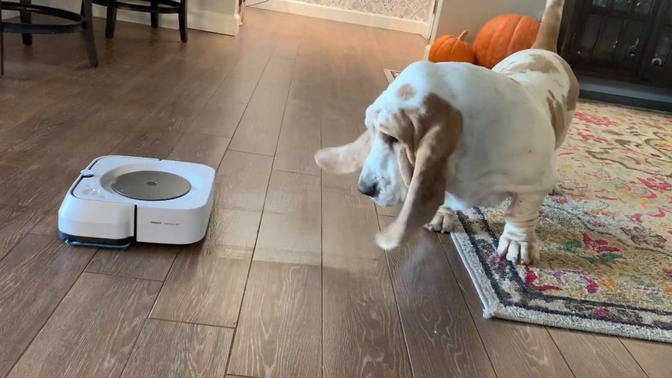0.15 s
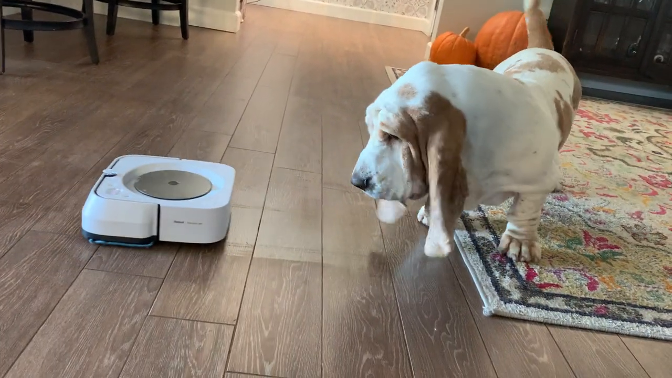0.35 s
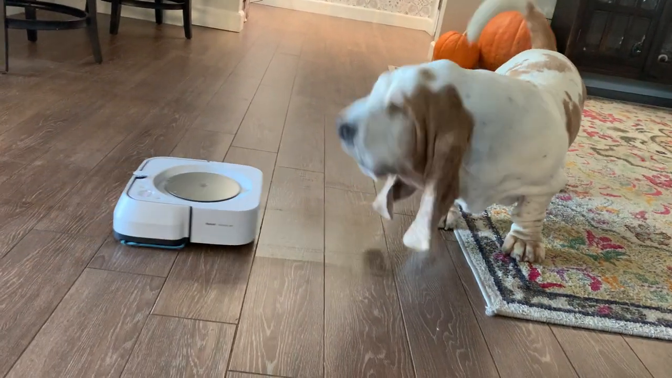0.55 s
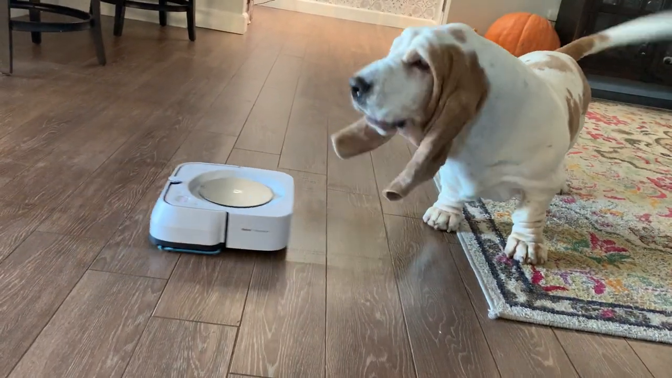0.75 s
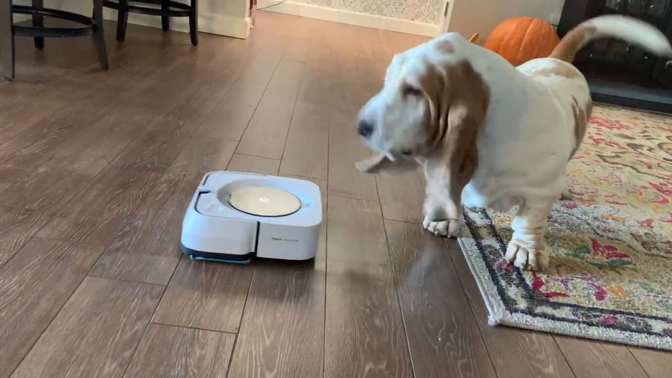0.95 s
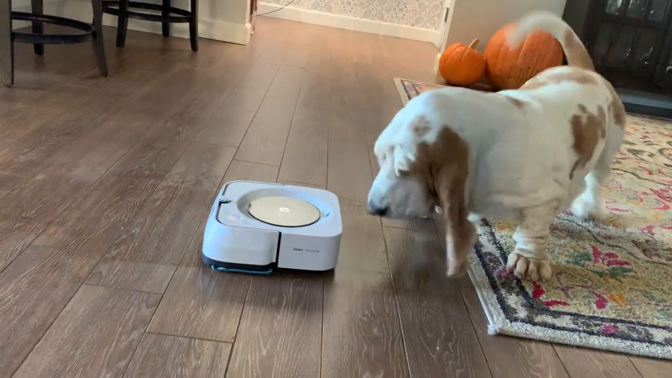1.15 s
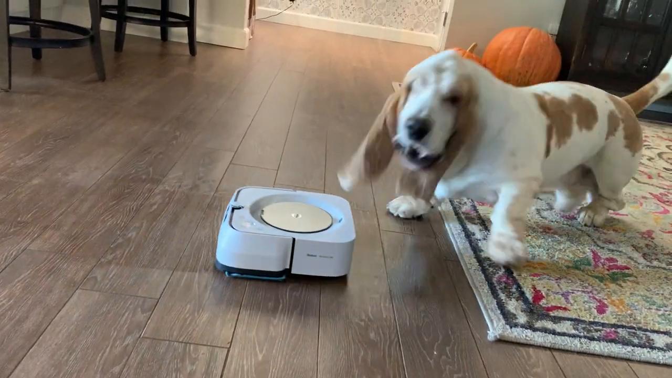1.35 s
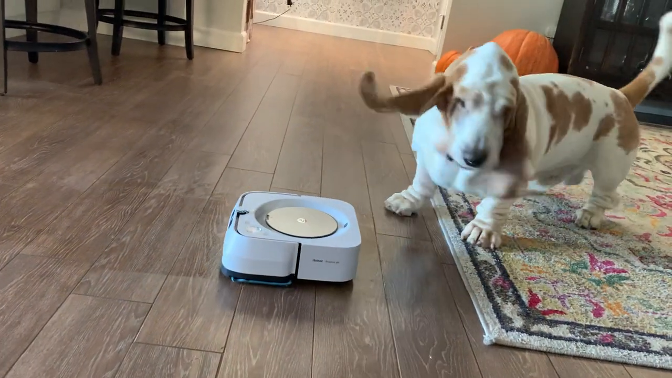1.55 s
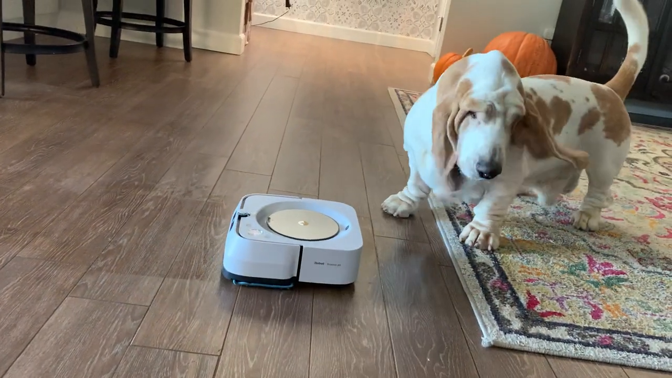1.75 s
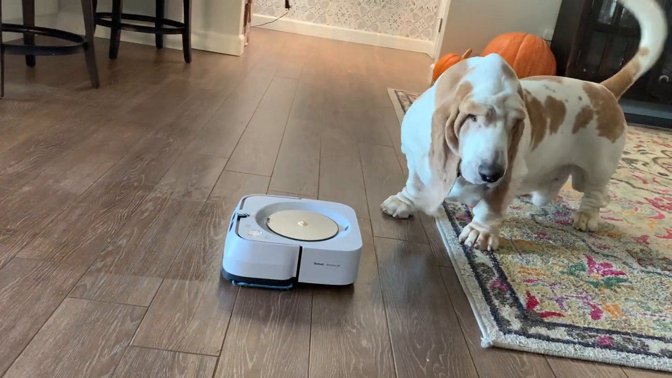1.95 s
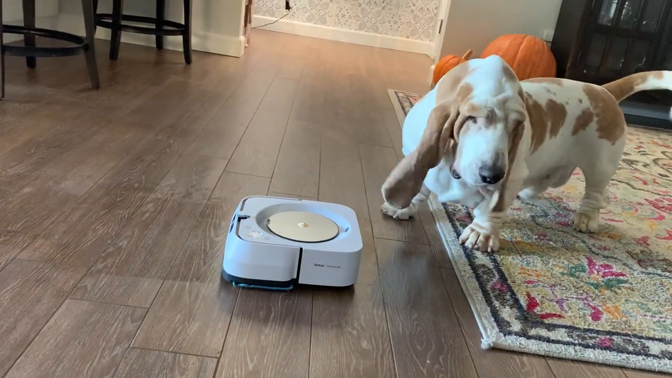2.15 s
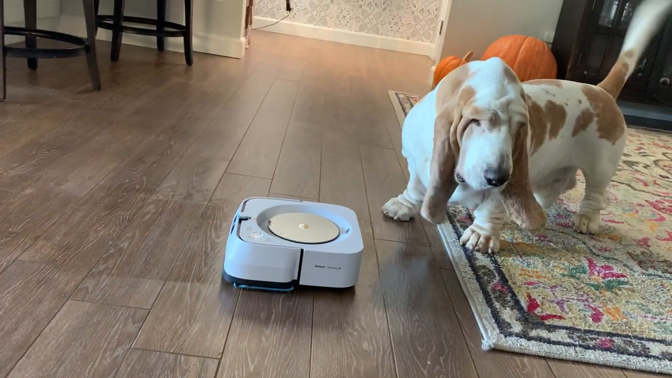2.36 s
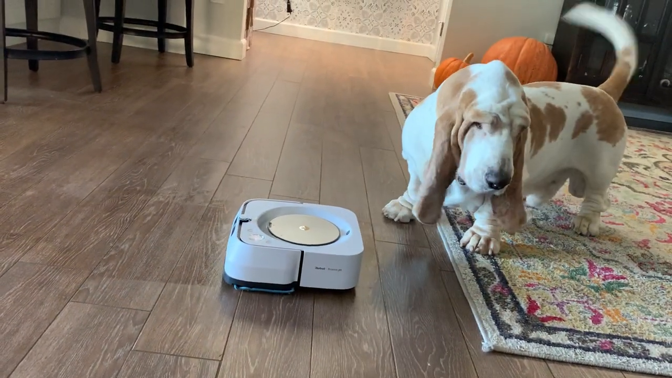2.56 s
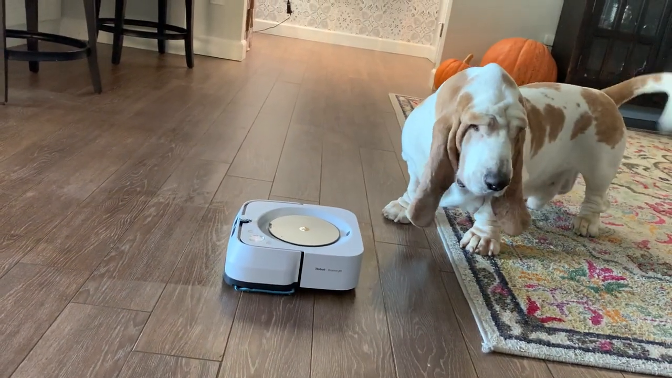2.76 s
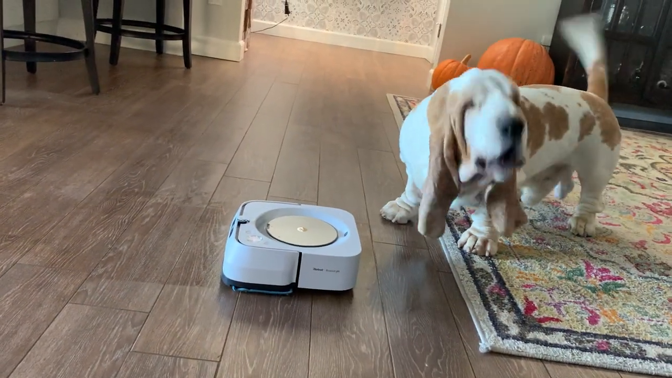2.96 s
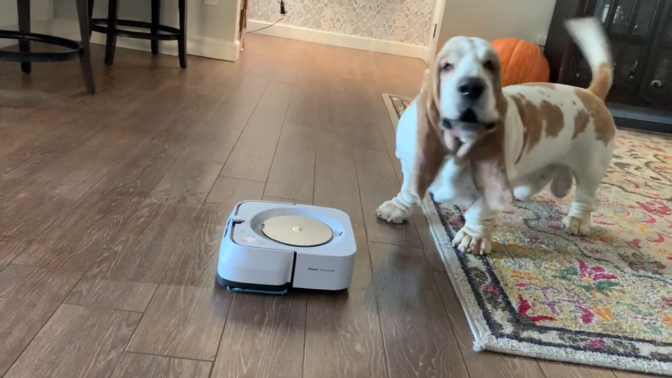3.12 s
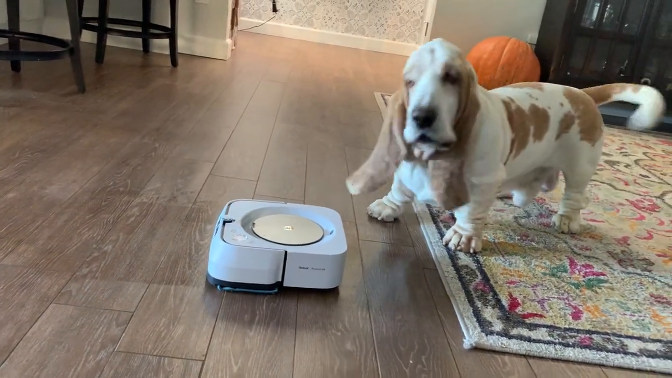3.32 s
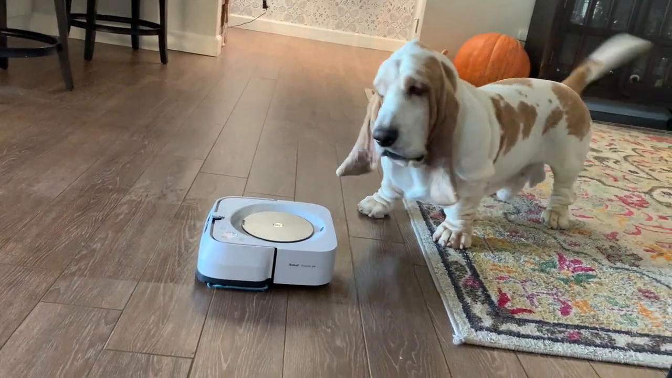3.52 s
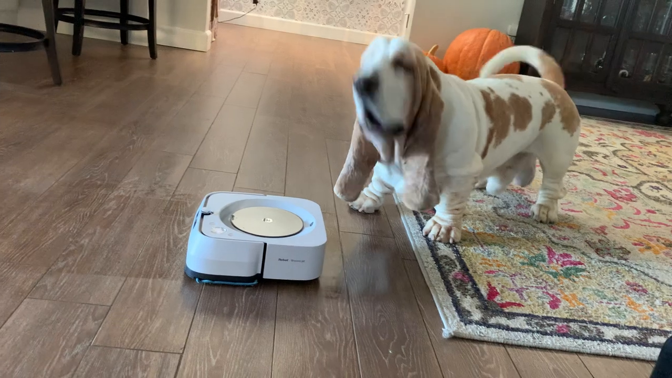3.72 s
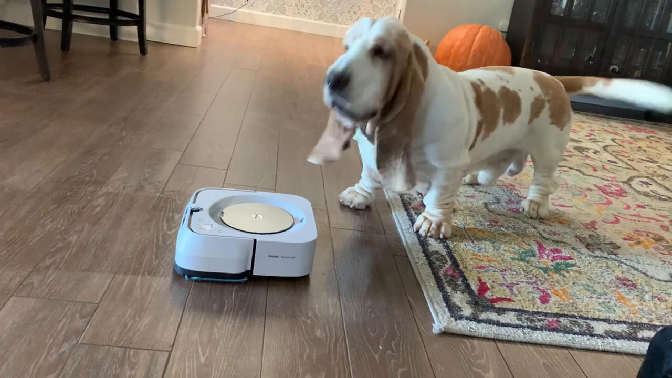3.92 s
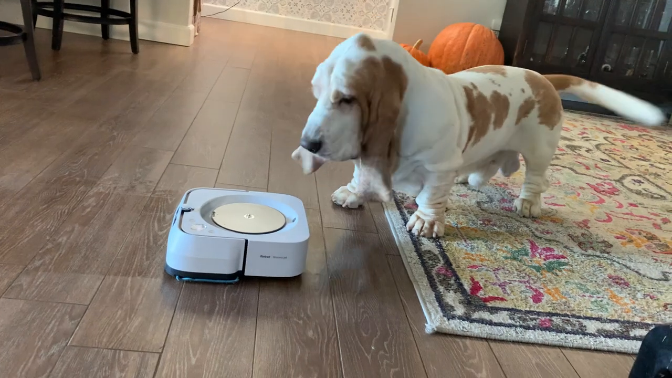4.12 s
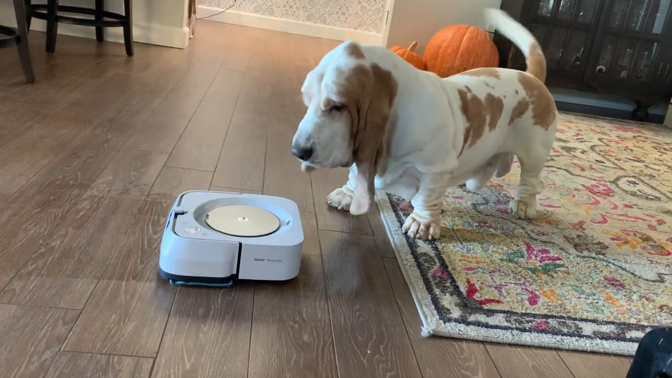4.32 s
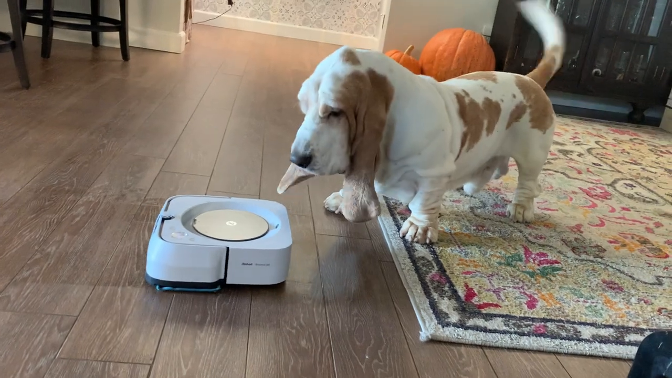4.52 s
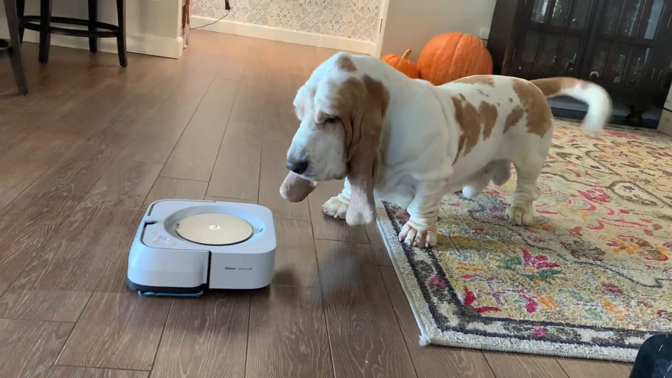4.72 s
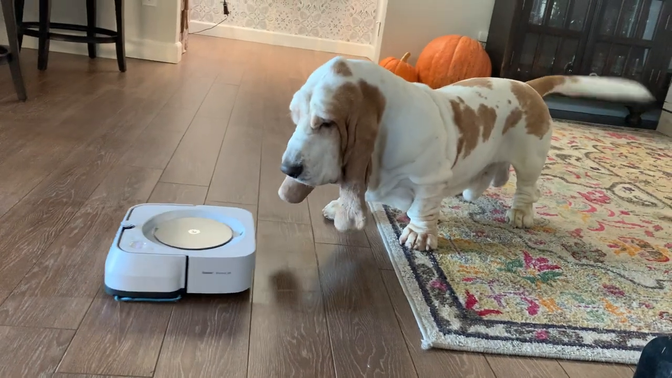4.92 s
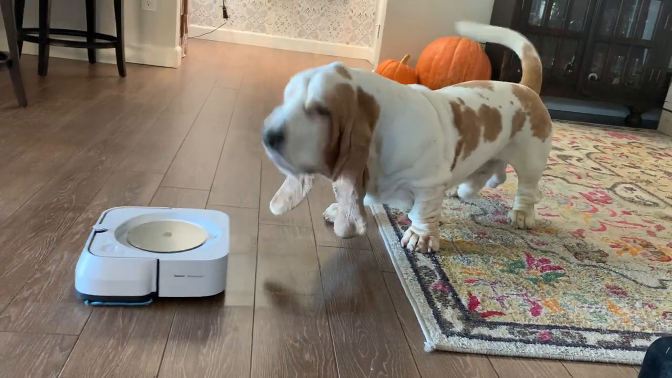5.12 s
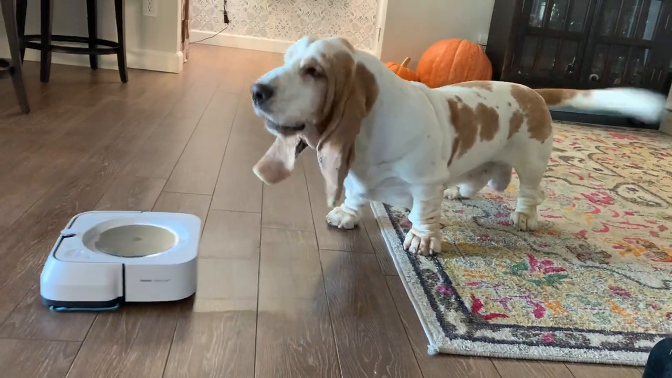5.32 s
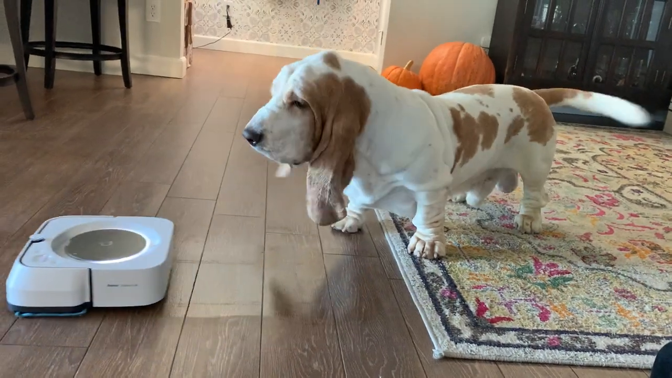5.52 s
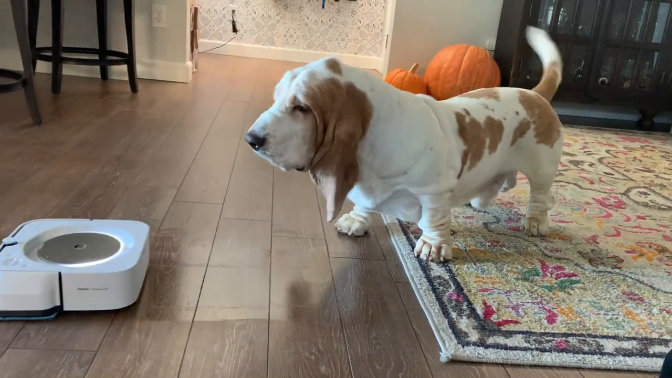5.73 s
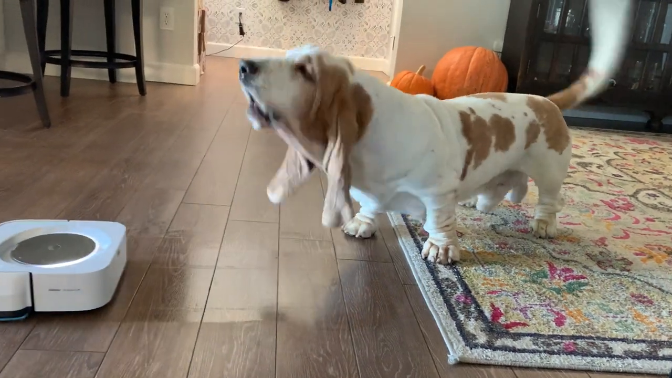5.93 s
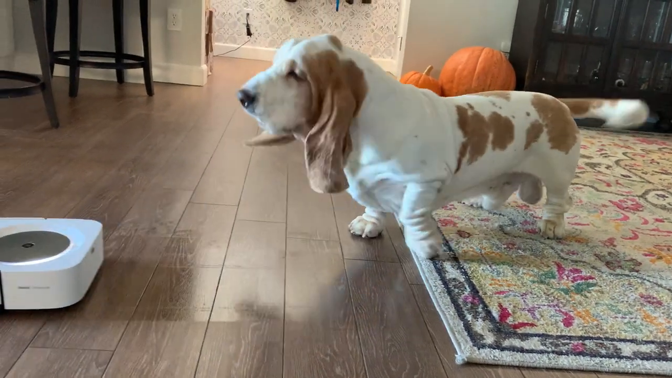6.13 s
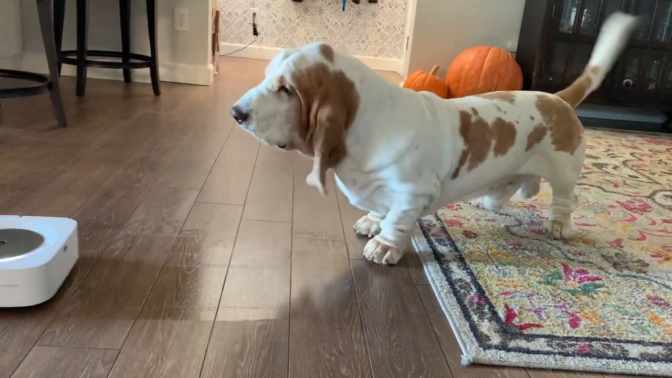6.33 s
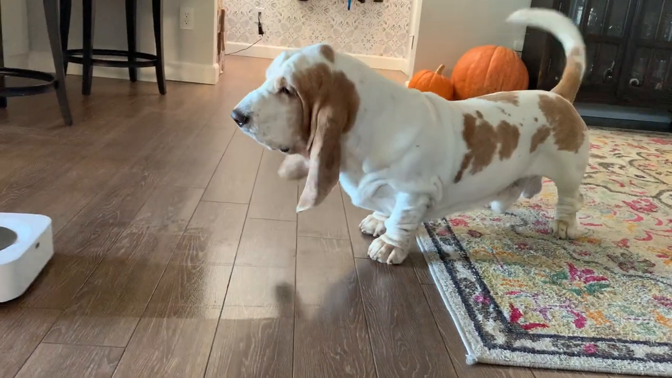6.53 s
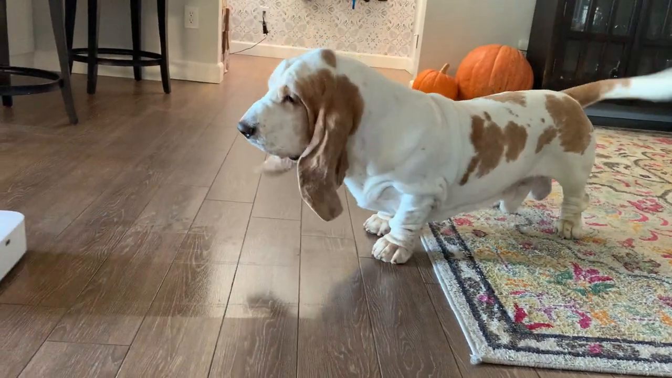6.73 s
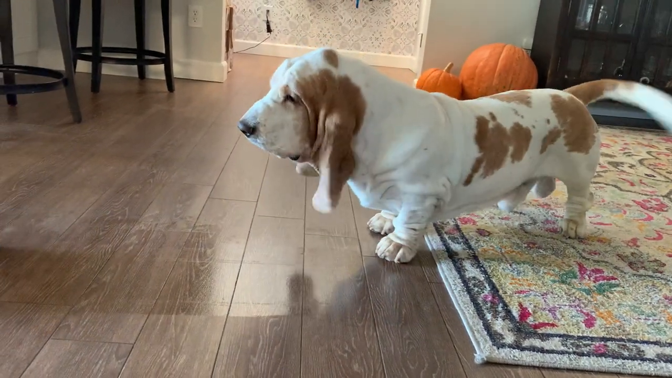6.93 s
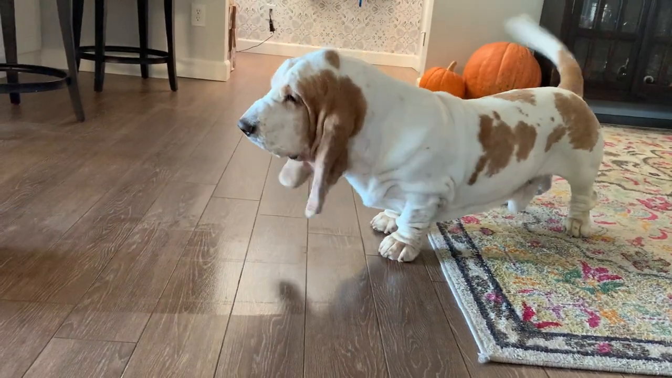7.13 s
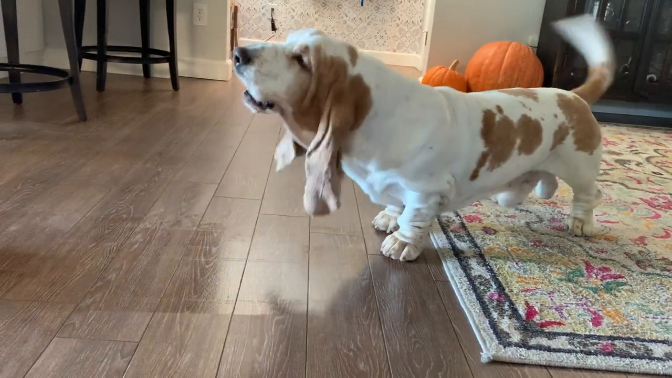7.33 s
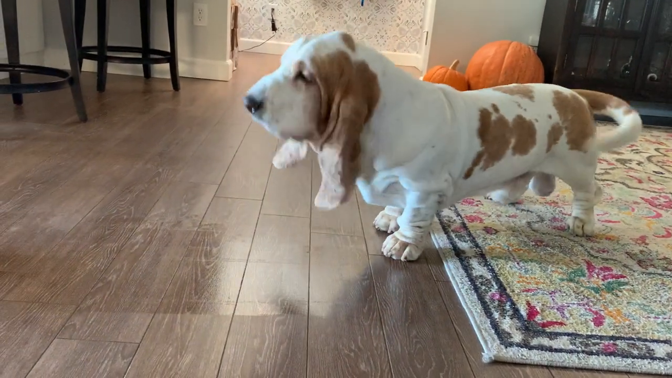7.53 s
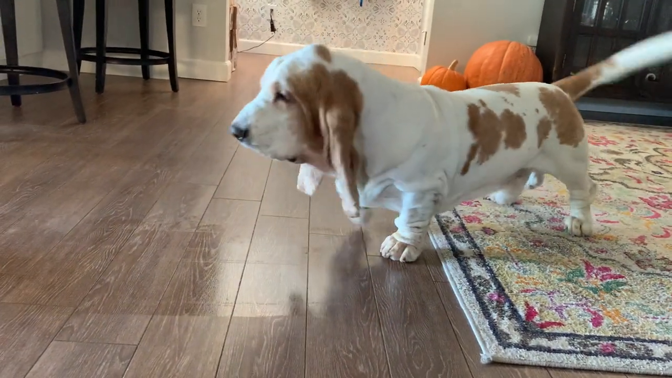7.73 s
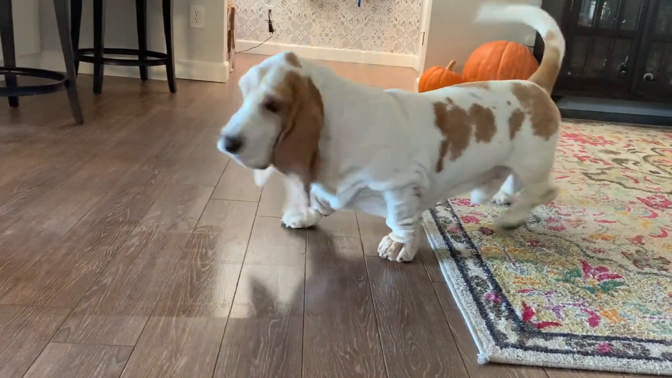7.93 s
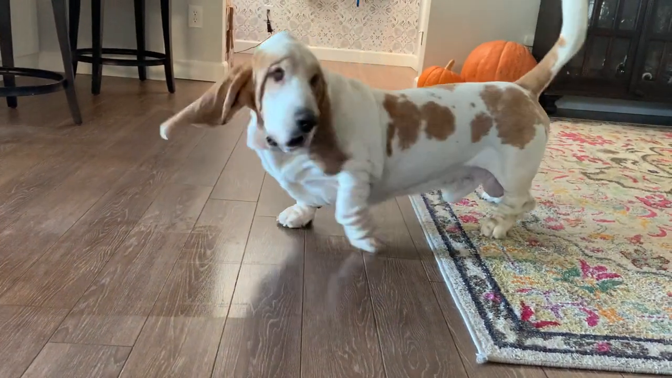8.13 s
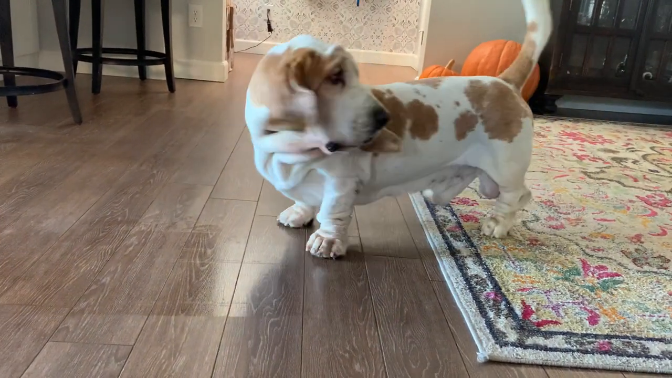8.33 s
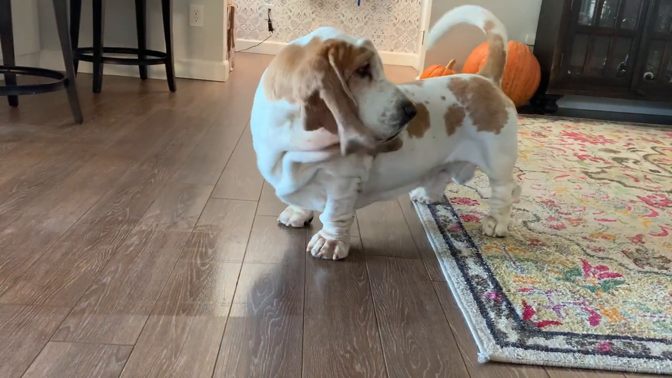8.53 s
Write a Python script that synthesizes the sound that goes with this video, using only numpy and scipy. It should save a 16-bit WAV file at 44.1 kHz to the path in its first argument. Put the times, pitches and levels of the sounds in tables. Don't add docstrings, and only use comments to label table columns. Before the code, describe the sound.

Loud, rounded woofs, each swooping up and quickly down, bounce off a wooden floor and cupboards. Between them lie a faint motor whir, a brief soft jet with a pump whine, tiny claw ticks and dull far thumps. The drive grows clearer in the second half, and after the seventh bark heavy footfalls knock on the boards. Close handheld phone pickup, stereo, with low rumble.

```python
import sys
import numpy as np
from scipy import signal
from scipy.fft import rfft, irfft, next_fast_len
from scipy.io import wavfile
from scipy.ndimage import uniform_filter1d

SR = 44100
rng = np.random.default_rng(int(sys.argv[2]) if len(sys.argv) > 2 else 0)


def master_out(mix):
    frames = np.transpose(np.atleast_2d(mix))
    ceiling = np.clip(frames, -1, 1)
    pcm = np.round(ceiling * 32767).astype(np.int16)
    wavfile.write(sys.argv[1], SR, pcm)


def natural_amplitude(level_db):
    exponent = np.asarray(level_db, float) / 20
    return 10 ** exponent


N = 382347

# top of the arch in seconds, top pitch in Hz, effort in dB, rise in seconds, fall in seconds.
BARKS = [(.635, 463, -.5, .12, .175), (1.338, 445.7, 1.5, .135, .135), (3.01, 459, 1.5, .13, .155),
         (3.783, 454.8, 2, .112, .16), (5.225, 461.3, 2, .142, .17), (5.96, 453.4, 2.5, .11, .16),
         (7.35, 452.4, 3.5, .138, .17)]
# growled lead-in in seconds, gaping mouth in Hz, held mouth in Hz,
# brightness in dB, hoarseness 0-1.
MOUTHINGS = [(.085, 2000, 1300, -1, 0.07), (.04, 1880, 1620, -3, 0.18), (.045, 1993, 1290, 2, 0.03),
             (.038, 1780, 1290, 2, 0.06), (.11, 2000, 1300, 0, .05), (.027, 1666, 1280, -4, .05),
             (.07, 1748, 1272.4, -5, .06)]
# place (-2 lead-in starts, -1 rise starts, 0 top, 1 fall ends),
# share of top pitch, effort in dB, gape 0-1, mouth ring in dB, chest ring in dB.
ARCH = [(-2, .16, -68, 0.964, -7.5, 11.5), (-1, .34, -45.5, 0.955, -6, 8), (-.75, .69, -27, .85, 3.5, -4),
        (-.5, .9, -18.5, .42, 3.5, -2), (-.25, 0.9615, -14.5, .03, 4.5, -2.5), (0, 0.9984, -15, .01, 0, -7),
        (.36, .91, -21, .01, 2, -0.66), (.55, .75, -36.5, 0.075, 0.3, 3.5),
        (0.961, 0.25, -52, -.2, 0.5, 5.5)]
# centre in Hz, width in Hz, level in dB.
CHEST = [(440, 160, 1), (816.8, 130, -1.5)]
# centre in Hz, width in Hz, level in dB.
UPPER_THROAT = [(3514, 620, -25), (4755, 1000, -22.5), (5660, 830, -25), (8357, 1000, -33),
                (9223, 1700, -35.5)]
# centre in Hz, width in Hz, depth in dB.
POCKETS = [(2760, 270, -26), (7050, 350, -18)]
# frequency in Hz, share 0-1.
RASP = [(400, .02), (1500, .05), (3000, .14), (6000, .35), (9000, .75)]
# frequency in Hz, level in dB.
BREATH_TONE = [(1000, -22.5), (1800, -12), (2800, -31), (4300, -16), (7000, -25), (9300, 4), (10800, -10.5),
               (13500, -3.5), (16000, -13)]
# delay in seconds, level in dB.
BOUNCES = [(.0032, -11.5), (.0075, -15), (0.0127, -13), (.017, -19.5), (.023, -19)]
# frequency in Hz, T60 in seconds.
KITCHEN_T60 = [(60, 0.88), (130, 0.17), (250, 0.58), (500, 0.5312), (1300, 0.605), (3000, 0.62),
               (6000, 0.37), (12000, 0.48)]
# frequency in Hz, level in dB.
VOICE_TAIL = [(100, -9.5), (500, -2), (1500, -12), (3000, -12.5), (9000, -10)]
# frequency in Hz, level in dB.
KNOCK_TAIL = [(100, -0.92), (600, -1.5), (9000, 0.04)]
# frequency in Hz, likeness 0-1.
TAIL_LIKENESS = [(100, 0.9955), (300, 0.39), (600, 0.6), (1200, 0.25), (3000, 0.47), (9000, 0.46)]
# frequency in Hz, left minus right in dB.
PORT_LEVEL = [(60, -1), (300, 2), (600, -0.5), (1200, -2.5), (2400, -0.2), (4500, -4.5), (8000, -0.77),
              (13000, 1.95)]
# frequency in Hz, left lead in radians.
PORT_PHASE = [(60, .2), (300, 0.48), (600, 0.27), (1200, 0.41), (2400, 1.1), (4500, 2.1), (8000, 0.64),
              (13000, 1.4)]
# start in seconds, peak in dB, rattle in dB, push in Hz, room share in dB.
KNOCKS = [
    (2.188, -39, -103, 64.8, 12),
    (4.327, -39, -76, 156, -3),
    (4.56, -40, -84, 139.3, 11),
    (4.85, -74.5, -79, 81.7, -0.5),
    (6.636, -47, -72, 86.7, 14),
    (6.851, -37.5, -72, 104, 18.5),
    (7.726, -23, -48, 158.6, 10.5),
    (8.29, -18, -47, 92.1, 11.5),
]
# frequency in Hz, level in dB.
RATTLE_TONE = [(100, 24), (250, 25), (600, 18), (1200, 13), (2200, 7.5), (4000, -1), (8000, -7.5),
               (14000, -12)]
# start in seconds, level in dB, pitch in
# Hz, length in seconds.
DRY_PUFFS = [(2.962, -37, 80, .03), (5.778, -38, 110, .034), (5.781, -40, 800, .007),
             (5.784, -44, 330, .011)]
# start in seconds, peak in dB.
CLAW_TICKS = [(1.0293, -51.5), (1.0417, -56.5), (4.3251, -69), (8.1688, -58.5), (8.1871, -54)]
# time in seconds, level in dB.
DRIVE_LEVEL = [(0, -84), (.3, -79.5), (1.1, -74.5), (2.3, -99), (4.3, -99), (4.6, -80), (5.0, -71),
               (5.4, -62.5), (6.0, -60), (7.1, -61.5), (7.7, -59.5), (8.67, -63.5)]
# frequency in Hz, level in dB per Hz.
DRIVE_TONE = [(240, -34), (400, -9.5), (705, -18.5), (821, -11), (1080, -23), (1660, -3.5), (2030, -10.5),
              (4090, -12), (7210, -26.5), (9210, -19), (11400, -43.5), (13300, -26.5), (15500, -44)]
# time in seconds, share of cruising speed.
DRIVE_SPEED = [(0, .74), (.45, 1.15), (1.1, 1.1), (1.8, .9), (4.3, .6), (4.65, .69), (5.0, .76),
               (5.35, 1.0), (8.67, 1.0)]
# centre in Hz, width in Hz, level in dB.
GEARS = [(814, 47, -22.5), (1648, 23, -8), (2472, 50, -13.5), (2690, 50, -19.5), (3081, 45, -15.5),
         (4126, 260, -16), (4110, 60, -17.5), (9220, 90, -23)]
# time in seconds, level in dB.
SPRAY_LEVEL = [(2.388, -90.5), (2.448, -69), (2.6, -61), (2.799, -65), (3.199, -68), (3.5, -66), (3.6, -85)]
# frequency in Hz, level in dB per Hz.
SPRAY_TONE = [(180, -73), (300, -35), (484, 0.5), (1050, -8.5), (1810, -10), (2360, -31), (3400, -10.5),
              (5760, -15.5), (9760, -18), (11500, -31.5), (15500, -22)]
# time in seconds, share of full speed.
PUMP_SPEED = [(2.4, .45), (2.47, .8), (2.55, .96), (2.65, 1.02), (2.75, .95), (2.85, .8), (3.6, .95)]
# frequency in Hz, level against the jet in dB.
PUMP_WHINE = [(1800, -18), (4500, -20), (3500, -22), (487, -17.5)]
# frequency in Hz, level against the jet in dB.
NOZZLE = [(9598, -14), (10045, -10)]
# time in seconds, level in dB, half length in seconds.
SHIFTS = [(1.62, -68.5, .1), (2.12, -64, .17), (2.65, -68, .12), (4.37, -57, .1), (4.9, -57, .13),
          (5.53, -56, .12), (6.95, -61.5, .2), (7.9, -56, .13), (8.47, -53, .08)]
# frequency in Hz, level in dB per Hz.
RUMBLE_TONE = [(12, -24.5), (20, 9), (140, -11), (294, -19), (468, -27.5), (1220, -38.5), (1480, -40.5),
               (1650, -31), (1890, -42), (3760, -44), (14000, -76)]
# frequency in Hz, likeness -1 to 1.
NOISE_LIKENESS = [(60, 0.94), (180, 0.097), (550, -0.6), (1650, -0.41), (4970, 0.019), (15000, 0.58)]
# centre in Hz, width in Hz, depth in dB.
MIC_NOTCH = (11600, 440, -34)

DOG_PAN_DB, UPPER_DB, BREATH_DB = -1, -5.5, -47.5
MOUTH_WIDTH_HZ, SOFT_HZ = 278.7, 189.6
DULL_HZ = 90
NOSE_HZ, NOSE_DB, NOSE_PER_BRIGHT = 2260, -15.5, 1.1
NOSE_FOLLOWS, HELD_HZ = 0.15, 1260
UPPER_PER_BRIGHT, UPPER_PER_HOARSE_DB = 1, 39.5
RATTLE_T60_S = 0.048
RUMBLE_DB, RUMBLE_GROWS_DB_PER_S = -72.5, 1.1159
SHAKE_DB, SHAKE_S, SHAKE_LAG_S = -57.5, 0.15, 0.08
HUM_HZ, HUM_DB = 119, -77
MIC_LOW_HZ = 60.24
CONTROL_STEP = 32
TAIL_SIZE = 30000


def dog():
    out = np.zeros((2, N))
    tails = kitchen(VOICE_TAIL, count=len(BARKS))
    for call, mouthing, tail in zip(BARKS, MOUTHINGS, tails):
        start, voice = bark(call, mouthing)
        near = np.pad(voice, ((0, 0), (0, 1500)))
        head_moves = rng.uniform(-1, 1, (len(BOUNCES), 2))
        for (delay, db), (stretch, sign) in zip(BOUNCES, head_moves):
            add(near, delay * (1 + 0.15 * stretch), natural_amplitude(db) * np.sign(sign) * voice)
        add(out, start, near)
        add(out, start, signal.fftconvolve(near, tail, axes=1))

    def half(f):
        return natural_amplitude(read(PORT_LEVEL, f) / 2) * np.exp(0.5j * read(PORT_PHASE, f))
    return coloured(out, lambda f: np.array([half(f), 1 / half(f)]))


def bark(call, mouthing):
    *mouth, bright_db, hoarse = mouthing
    t, hz, effort_db, *tract = gesture(*call, *mouth)
    wobble_hz = 2.0 * evened(uniform_filter1d(rng.standard_normal(len(t)), size=300))
    turns = np.cumsum(hz + wobble_hz) / SR
    controls = [v[::CONTROL_STEP] for v in [hz, *tract]]
    throat = throat_of(*controls, bright_db, hoarse, (mouth[2] / HELD_HZ) ** NOSE_FOLLOWS)
    fundamental = np.exp(2j * np.pi * turns)
    overtones = np.cumprod(np.tile(fundamental, (len(throat), 1)), axis=0)
    voice = -(filled(throat, len(t)) * overtones).real.sum(0)
    puffs = (0.2 + np.exp(-(turns % 1) / 0.25)) * rng.standard_normal(len(t))
    gusts = natural_amplitude(2.1 * evened(uniform_filter1d(rng.standard_normal(len(t)), size=900)))
    breath = evened(coloured(puffs, lambda f: natural_amplitude(read(BREATH_TONE, f)))) * gusts
    breath_db = BREATH_DB - 8.0 * hoarse + 0.73 * (effort_db + 13.0)
    sound = natural_amplitude(effort_db) * voice + natural_amplitude(breath_db) * breath
    pan = natural_amplitude([[DOG_PAN_DB / 2], [-DOG_PAN_DB / 2]])
    return t[0], sound * signal.windows.tukey(len(t), 0.3) * pan


def gesture(top_s, top_hz, effort_db, rise_s, fall_s, lead_s, gape_hz, held_hz):
    place, pitch, db, gape, mouth_db, chest_db = np.transpose(ARCH)
    before = rise_s * np.maximum(place, -1) + lead_s * np.minimum(place + 1, 0)
    s = top_s + np.where(place < 0, before, fall_s * place)
    t = np.arange(s[0], s[-1], 1 / SR)
    mouth_hz = held_hz + gape * (gape_hz - held_hz)
    controls = np.log(top_hz * pitch), effort_db + db, mouth_hz, chest_db, mouth_db
    glide, *rest = (uniform_filter1d(np.interp(t, s, c), size=700, mode="nearest") for c in controls)
    return t, np.exp(glide), *rest


def throat_of(hz, mouth_hz, chest_db, mouth_db, bright_db, hoarse, stretch):
    f = np.arange(1, 36)[:, None] * hz
    throat = pole(f, *CHEST[0]) * natural_amplitude(chest_db) - pole(f, *CHEST[1])
    throat[0] *= 1 + (SOFT_HZ / hz) ** 2
    throat += 1j * natural_amplitude(mouth_db + bright_db) * pole(f, mouth_hz, MOUTH_WIDTH_HZ, 0) ** 2
    throat *= 1 - 0.7 * np.exp(-((f - 1.36 * mouth_hz) / 170) ** 2)
    nose_db = NOSE_DB + NOSE_PER_BRIGHT * bright_db
    throat += 1j * natural_amplitude(nose_db) * pole(f, NOSE_HZ * stretch, 340, 0) ** 2
    shift = stretch * (mouth_hz / 1300) ** 0.05
    upper_db = UPPER_DB + 0.72 * mouth_db + UPPER_PER_BRIGHT * bright_db + UPPER_PER_HOARSE_DB * hoarse
    upper = sum(natural_amplitude(db) * pole(f, centre * shift, width, 0) ** 2 for centre, width, db in UPPER_THROAT)
    throat += 1j * natural_amplitude(upper_db) * upper
    flutter = rng.standard_normal((*f.shape, 2))
    flutter = evened(uniform_filter1d(flutter, size=5, axis=1) @ [1, 1j])
    patches = evened(uniform_filter1d(rng.standard_normal(f.shape), size=40, axis=1))
    throat *= natural_amplitude(5.5 * patches * (f > 2500))
    throat *= dips(POCKETS, f / stretch) ** ((hz / hz.max()) ** 4)
    throat[1:] /= 1 + (DULL_HZ / hz) ** 2
    rasp = np.clip(read(RASP, f) + hoarse * (f > 700), 0, 1)
    return throat * (1 - rasp + rasp * flutter)


def kitchen(tail_db, count):
    taps = np.zeros((count, 2, TAIL_SIZE))
    at = np.arange(400, TAIL_SIZE, 20)
    shape = (count, 2, len(at))
    np.put_along_axis(taps, at + rng.integers(0, 20, shape), rng.choice([-1., 1.], shape), 2)
    hz, t, z = signal.stft(taps, SR, nperseg=256)
    same = np.clip(read(TAIL_LIKENESS, hz), 0, 1)[:, None]
    z[:, 1] = same * z[:, 0] + np.sqrt(1 - same ** 2) * z[:, 1]
    decay = natural_amplitude(-60 * t / read(KITCHEN_T60, hz)[:, None])
    tails = signal.istft(z * decay, SR, nperseg=256)[1]
    return coloured(tails / np.linalg.norm(tails[0, 0]), lambda f: natural_amplitude(read(tail_db, f)))


def boards():
    out = np.zeros((2, N))
    tails = kitchen(KNOCK_TAIL, count=len(KNOCKS))
    for (s, db, rattle_db, hz, room_db), tail in zip(KNOCKS, tails):
        sound = knock(db, rattle_db, hz)
        add(out, s, sound)
        add(out, s, natural_amplitude(room_db) * signal.fftconvolve(sound[None], tail, axes=1))
    for s, *puff in DRY_PUFFS:
        add(out, s, flap(*puff))
    for s, db in CLAW_TICKS:
        add(out, s, tick(db))
    return out


def knock(db, rattle_db, hz):
    t = np.arange(6000) / SR
    grit = rng.standard_normal(len(t))
    rattle = evened(coloured(grit, lambda f: natural_amplitude(read(RATTLE_TONE, f)) * (f > 150)))
    rattle *= natural_amplitude(rattle_db + 21.5 - 60 * t / RATTLE_T60_S) * (1 - np.exp(-t / 0.012))
    return ring(db, hz, t60_s=0.027, rise_s=0.0017) + rattle


def ring(db, hz, t60_s, rise_s):
    t = np.arange(6000) / SR
    return natural_amplitude(db - 60 * t / t60_s) * np.sin(2 * np.pi * hz * t) * (1 - np.exp(-t / rise_s))


def flap(db, hz, length_s):
    t = np.arange(0, length_s, 1 / SR)
    return natural_amplitude(db) * np.sin(2 * np.pi * hz * t) * np.hanning(len(t))


def tick(db):
    t = np.arange(1500) / SR
    grit = coloured(rng.standard_normal(len(t)), lambda f: abs(pole(f, 4380, 4000, 0)) * (f > 2200))
    return natural_amplitude(db - 6.0 - 60 * t / 0.045) * evened(grit)


def robot():
    t = np.arange(N) / SR
    speed = over_time(DRIVE_SPEED, t)
    gears = sum(natural_amplitude(db - 0.5) * whistle(hz * speed, width) for hz, width, db in GEARS)
    out = natural_amplitude(over_time(DRIVE_LEVEL, t)) * (noise(DRIVE_TONE, 1.5) + gears)
    start_s, end_s = 2.3, 3.7
    add(out, start_s, spray(np.arange(start_s, end_s, 1 / SR)))
    return out


def spray(t):
    speed = over_time(PUMP_SPEED, t)
    whine = sum(natural_amplitude(db) * whistle(hz * speed, 130) for hz, db in PUMP_WHINE)
    whine += sum(natural_amplitude(db) * whistle(np.full(len(t), hz), 18) for hz, db in NOZZLE)
    jet = noise(SPRAY_TONE, 2.0, size=len(t))
    return natural_amplitude(over_time(SPRAY_LEVEL, t)) * (jet + whine) * signal.windows.tukey(len(t), 0.12)


def house():
    t = np.arange(N) / SR
    swells = SHIFTS + [(row[0] + SHAKE_LAG_S, SHAKE_DB, SHAKE_S) for row in BARKS]
    level = natural_amplitude(RUMBLE_DB + RUMBLE_GROWS_DB_PER_S * t)
    level += sum(natural_amplitude(db) * np.exp(-((t - s) / half_s) ** 2) for s, db, half_s in swells)
    return level * noise(RUMBLE_TONE, 1.5) + natural_amplitude(HUM_DB) * whistle(np.full(N, HUM_HZ), 7.0)


def noise(tone, patchy_db, size=N, smear=8):
    frames = size // 256 + 5
    hz = np.fft.rfftfreq(1024, 1 / SR)
    a, b, c, d, patches = rng.standard_normal((5, 513, frames), dtype=np.float32)
    patches = evened(uniform_filter1d(uniform_filter1d(patches, smear, 0), smear, 1))
    same = np.clip(read(NOISE_LIKENESS, hz), -1, 1)[:, None]
    left = a + 1j * b
    right = same * left + np.sqrt(1 - same ** 2) * (c + 1j * d)
    z = np.array([left, right]) * natural_amplitude(read(tone, hz)[:, None] + patchy_db * patches)
    return evened(signal.istft(z, nperseg=1024, noverlap=768)[1][:, :size])


def whistle(hz, width_hz):
    r = np.exp(-np.pi * width_hz * CONTROL_STEP / SR)
    drift = rng.standard_normal((len(hz) // CONTROL_STEP + 2, 2)) @ [1, 1j]
    for _ in range(2):
        drift = signal.lfilter([1 - r], [1, -r], drift)
    at = np.arange(len(hz)) / CONTROL_STEP
    knots = np.arange(len(drift))
    height = np.interp(at, knots, abs(drift))
    turn = np.interp(at, knots, np.unwrap(np.angle(drift)))
    return evened(height * np.cos(turn + 2 * np.pi * np.cumsum(hz) / SR))


def pole(hz, centre_hz, width_hz, db):
    return natural_amplitude(db) * centre_hz * width_hz / (centre_hz ** 2 - hz ** 2 + 1j * hz * width_hz)


def dips(notches, f):
    return natural_amplitude(sum(db * np.exp(-((f - hz) / width) ** 2) for hz, width, db in notches))


def coloured(x, gain):
    size = next_fast_len(x.shape[-1] + 2048)
    return irfft(rfft(x, size) * gain(np.fft.rfftfreq(size, 1 / SR)), size)[..., :x.shape[-1]]


def read(points, hz):
    f, value = np.transpose(points)
    return np.interp(np.log(hz + 1), np.log(f + 1), value)


def over_time(rows, t):
    return np.interp(t, *np.transpose(rows))


def filled(v, size):
    at = np.minimum(np.arange(size) / CONTROL_STEP, v.shape[-1] - 1.001)
    i = at.astype(int)
    return v[..., i] + (at - i) * (v[..., i + 1] - v[..., i])


def evened(x):
    return x / np.sqrt(np.mean(abs(x) ** 2) + 1e-20)


def add(mix, s, sound):
    part = mix[:, round(s * SR):][:, :sound.shape[-1]]
    part += sound[..., :part.shape[1]]


def scene():
    return dog() + boards() + robot() + house()


def low_pass(x):
    return signal.sosfilt(signal.butter(12, 15760, fs=SR, output="sos"), x)


def record(dry):
    hz, width, db = MIC_NOTCH

    def microphone(f):
        notch = natural_amplitude(db * np.exp(-((f - hz) / width) ** 4))
        return notch * f ** 2 / (f ** 2 + MIC_LOW_HZ ** 2)
    heard = coloured(dry, microphone)
    limited = heard / (1 + abs(heard) ** 6) ** (1 / 6)
    return low_pass(limited)


dry = scene()
out = record(dry)
master_out(out)
```